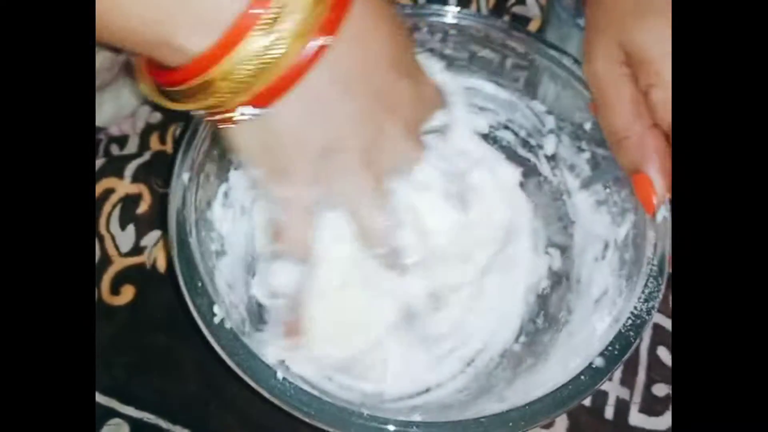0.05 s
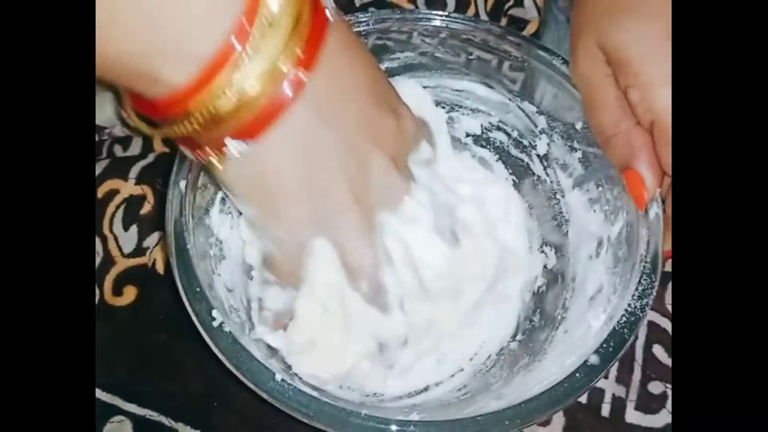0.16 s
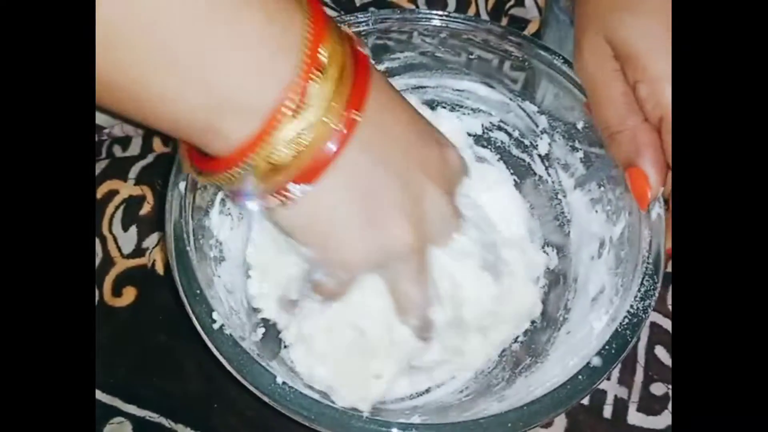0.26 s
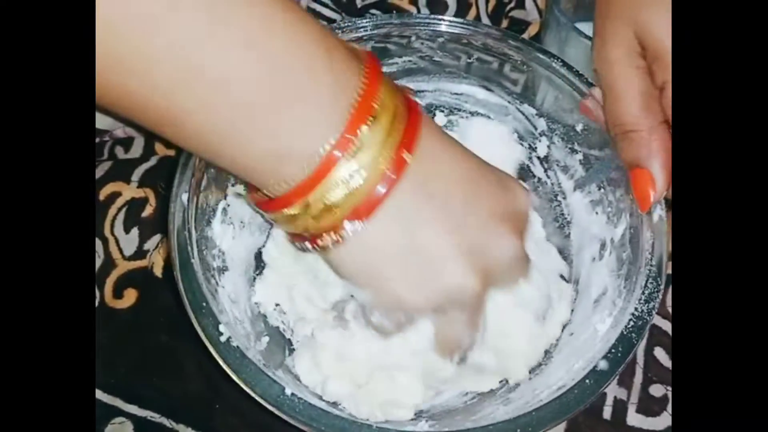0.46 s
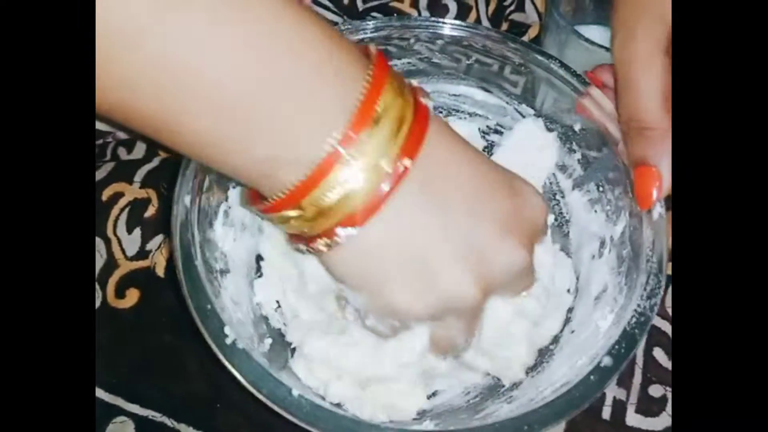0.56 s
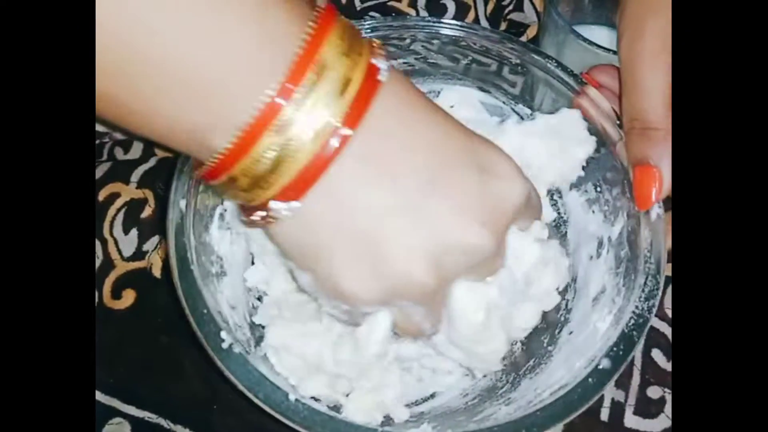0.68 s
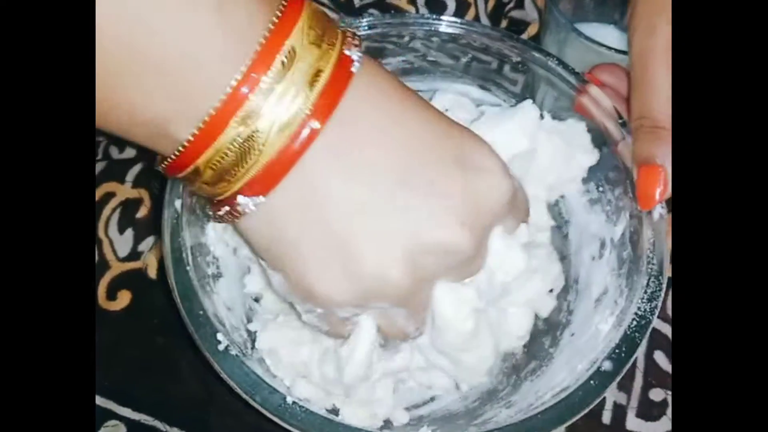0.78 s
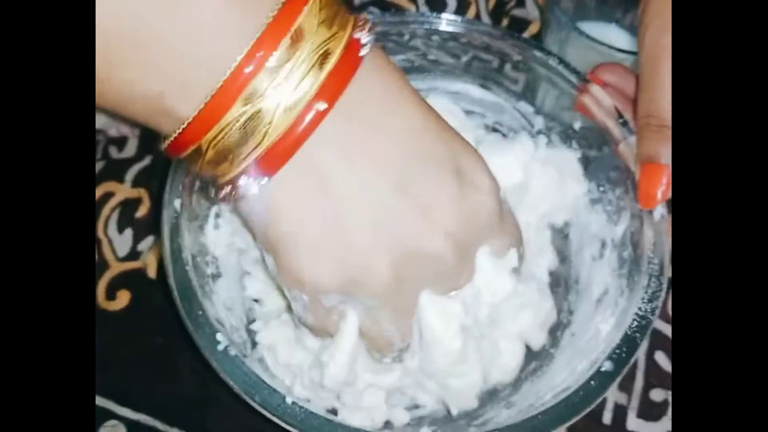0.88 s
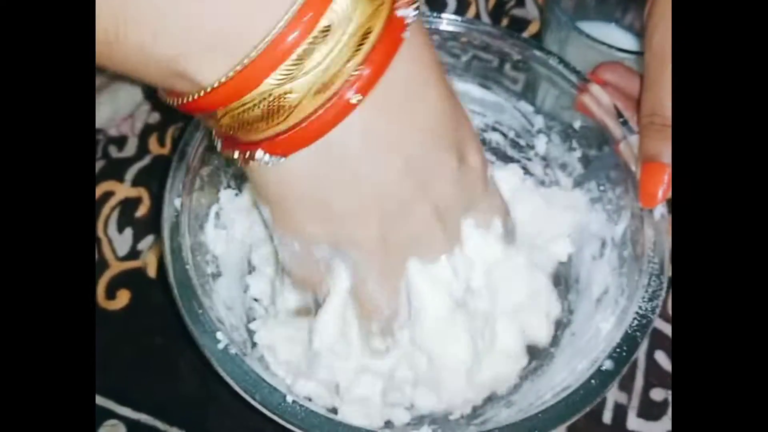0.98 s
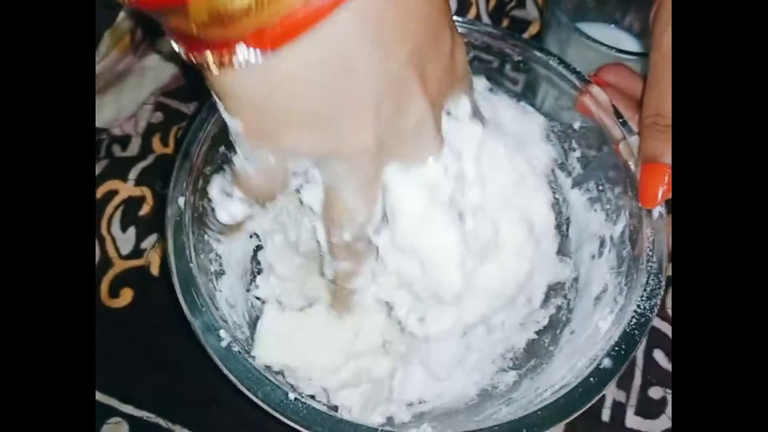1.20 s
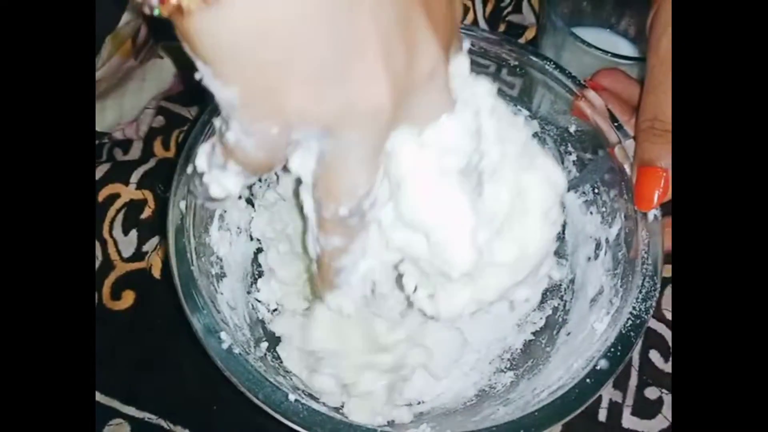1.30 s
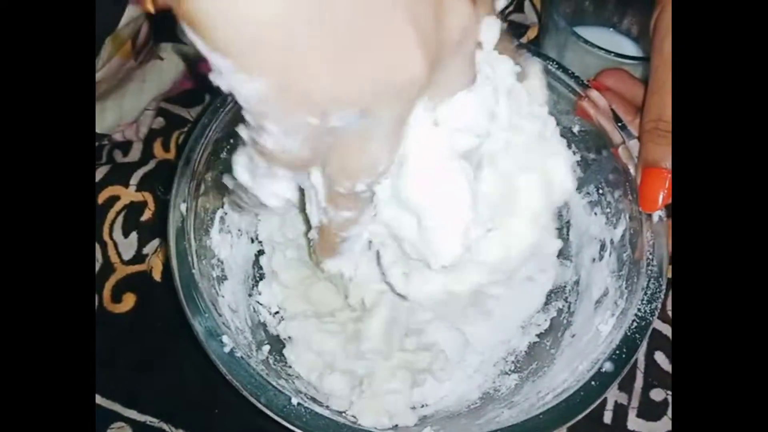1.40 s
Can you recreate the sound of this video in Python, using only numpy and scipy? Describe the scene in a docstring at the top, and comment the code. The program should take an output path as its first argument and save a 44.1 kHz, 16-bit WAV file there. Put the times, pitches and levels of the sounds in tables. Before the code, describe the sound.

Close, wet dough kneading with small ticks, a burst of bright bangle clinks and glass knocks

```python
"""Sticky dough crackles and ticks over a soft rumble: a hand kneads it in a glass bowl, heard close by.
The crackle is filtered random grains and tiny ringing air pockets; the rumble is filtered noise.
Bangles on the wrist soon clink, as noise clashes and struck modes, and knock on the ringing bowl's rim.
Skin squeaks once on the glass, a sinking unsteady sine. A faint hum and air lie under it all,
and the small room adds a diffuse tail to the near sounds."""
import sys
import numpy as np
from scipy import signal
from scipy.fft import rfft, irfft, next_fast_len
from scipy.io import wavfile
from scipy.ndimage import uniform_filter1d

SR = 44100
rng = np.random.default_rng(int(sys.argv[2]) if len(sys.argv) > 2 else 0)


def log_audio(samples):
    """Write samples as a 16-bit WAV file to the path given in sys.argv[1]."""
    # one column per channel
    frames = np.atleast_2d(samples).T
    # limit to full scale, then quantise
    limited = np.clip(frames, -1, 1)
    pcm = np.round(limited * 32767).astype(np.int16)
    wavfile.write(sys.argv[1], SR, pcm)


N = 63945
TIME = np.arange(N) / SR  # seconds
POP_CYCLES = 55  # cycles a short pitched sound rings before it has fallen by 60 dB


def from_db(db):
    """Decibels to gain."""
    return 10 ** (np.asarray(db) / 20)


def rms_one(x):
    """Scale to rms 1."""
    return x / np.sqrt(np.mean(x ** 2) + 1e-20)


def fade(t60):
    """Exponential decay from 1, falling by 60 dB in t60 seconds."""
    return np.exp(-np.log(1000) * TIME / t60)


def tilt(hz, db_per_octave, corner_hz):
    """Gain of a harder or softer contact: 1 at 8 kHz, flat below the corner."""
    octaves = np.log2(np.maximum(hz, corner_hz) / 8000)
    return from_db(db_per_octave * octaves)


def colour(x, points, db_per_octave=0):
    """Causal (minimum-phase) filter through (Hz, dB) points, made by folding the cepstrum."""
    size = 2 * next_fast_len(N)
    hz = np.maximum(np.arange(size // 2 + 1) * SR / size, 1)
    at, db = np.transpose(points)
    gain = from_db(np.interp(np.log(hz), np.log(at), db))
    gain = gain * tilt(hz, db_per_octave, corner_hz=3545)
    cepstrum = irfft(np.log(gain))
    cepstrum[1:size // 2] *= 2
    cepstrum[size // 2 + 1:] = 0
    return irfft(rfft(x, size) * np.exp(rfft(cepstrum)))[:N]


def add(out, s, sound):
    """Mix a sound in from time s."""
    start = int(np.clip(s * SR, 0, N - 1))
    out[start:] += sound[:N - start]


def burst(t60):
    """A dying cluster of tiny contacts: decaying noise of energy 1."""
    x = rng.standard_normal(N) * fade(t60)
    return x / np.sqrt(np.sum(x ** 2))


def snap(t60):
    """One sharp release followed by a short dying crackle."""
    share = 0.26  # part of the energy in the first instant
    return np.sqrt(share) * (TIME == 0) + np.sqrt(1 - share) * burst(t60)


def ring(modes, db_per_octave, scatter_db, detune):
    """Struck modes, varied in strength and pitch from blow to blow; loose contact makes them flutter."""
    rattle_share, rattle_hz = .6, 70  # depth of the flutter, new flutter values per second
    out = np.zeros(N)
    knots = np.arange(int(N / SR * rattle_hz) + 2) / rattle_hz
    for hz, db, t60 in modes:
        strength, shift, phase = rng.standard_normal(3)
        t = TIME[TIME < 2 * t60]
        # complex values flutter both level and phase; the blow itself starts undisturbed
        wander = rng.standard_normal(len(knots)) + 1j * rng.standard_normal(len(knots))
        flutter = 1 + rattle_share * np.interp(t, knots, wander * (knots > 0))
        turn = 2j * np.pi * (hz * (1 + detune * shift) * t + phase)
        wave = np.real(flutter * np.exp(turn - np.log(1000) * t / t60))
        level = from_db(db + scatter_db * strength) * tilt(hz, db_per_octave, corner_hz=1110)
        out[:len(t)] += level * wave
    return out * (1 - fade(.002))  # soft onset


def grains(per_s):
    """Tiny clicks of uneven size and random sign at random instants, rms 1."""
    spread_db = 3.4
    sizes = from_db(spread_db * np.minimum(rng.exponential(1, N), 4)) * rng.choice([-1, 1], N)
    return rms_one(sizes * (rng.random(N) < per_s / SR))


def fine_pops():
    """Tiny air pockets burst at random, each ringing briefly at one of 20 pitches; rms 1."""
    pops_per_s, low_hz, high_hz = 900, 3750, 6200
    out, pitches = np.zeros(N), np.geomspace(low_hz, high_hz, 20)
    for hz in pitches:
        # two-pole resonator: pole radius r, angle w per sample
        r = np.exp(-np.log(1000) * hz / (POP_CYCLES * SR))
        w = 2 * np.pi * hz / SR
        clicks = grains(pops_per_s / len(pitches))
        out += signal.lfilter([np.sin(w)], [1, -2 * r * np.cos(w), r * r], clicks) / hz
    return rms_one(out)


def dough():
    """Dough peels in ticks over a crackle that follows the squeezing, with short pops and faint bowl tones."""
    # Sticky dough lets go. Each row: start in seconds, wet smack in dB, bright tick in dB.
    tick_events = [(0.011, -23, -10), (0.0373, -30, -12), (0.054, -16.5, -20), (0.1714, -49, -21),
                   (0.0962, -36, -32), (0.303, -19, -20), (0.4983, -32, -18), (0.6115, -39, -22),
                   (0.6341, -9.5, -14.5), (0.6398, -14, -23), (0.675, -17, -12.5), (0.699, -49, -14.5),
                   (0.726, -23.5, -27), (0.7293, -18, -17.5), (0.782, -25, -16.5), (0.7861, -17.5, -19),
                   (0.8001, -22, -13.5), (0.8026, -21.5, -14.5), (1.024, -32, -29), (1.0742, -26, -15),
                   (1.091, -32, -19), (1.1085, -22, -20), (1.1267, -23.5, -22.5), (1.139, -35, -21),
                   (1.2213, -50, -27)]
    # Short pitched pops of the dough and faint tones of the bowl, lower ones longer.
    # Each row: start in seconds, pitch in Hz, level in dB.
    pitched_events = [(0.108, 1676, -56), (0.3256, 5400, -34.5), (0.4754, 3630, -42), (0.4875, 3380, -41.5),
                      (0.756, 343, -71.5), (0.784, 4220, -42), (0.801, 3990, -45.5), (0.9126, 3810, -47.5),
                      (0.9689, 5510, -47.5), (0.986, 4250, -41), (0.999, 5400, -46), (1.0407, 3900, -56.5),
                      (1.3119, 3990, -56)]
    # Crackle of the worked dough. Each row: time in seconds, wet part in dB, fine part in dB.
    crackle = [(0, -50, -47.5), (0.059, -57, -46.5), (0.111, -56, -65.5), (0.289, -59, -49),
               (0.345, -64.5, -98), (0.449, -51.5, -59), (0.61, -62, -53), (0.68, -62.5, -64),
               (0.742, -59, -49), (0.758, -73.5, -79), (0.793, -58.5, -52), (0.877, -76.5, -66.5),
               (0.941, -69, -61), (0.992, -59.5, -53.5), (1.05, -66.5, -57), (1.164, -74, -55),
               (1.25, -86, -69), (1.33, -71.5, -60.5), (1.378, -89.5, -80), (1.45, -88.5, -87)]
    # Colours of the smacks and wet crackle, of the ticks, of the finest crackle. Each row: Hz, dB.
    smack_colour = [(500, -36.5), (1500, -22), (2700, -22), (3300, -8), (3950, -4.5), (5200, -9.5),
                    (7000, -13), (10000, -17.5), (16000, -25)]
    tick_colour = [(2500, -47.5), (4000, -9.5), (7000, -21), (10000, -11), (13000, -0.5), (14800, 8),
                   (16000, -12)]
    fizz_colour = [(2500, -41.5), (4000, -27.5), (8500, -19), (11000, -7.5), (13000, 5), (14800, 15),
                   (15400, 6.5), (15900, -8)]
    smack_t60_s, tick_t60_s = .01, .007
    grains_per_s, fine_pop_share = 4000, .7

    smacks, ticks, pitched = np.zeros((3, N))
    for s, smack_db, tick_db in tick_events:
        add(smacks, s, from_db(smack_db) * snap(smack_t60_s))
        add(ticks, s, from_db(tick_db) * snap(tick_t60_s))
    for s, hz, db in pitched_events:
        add(pitched, s, ring([(hz, db, POP_CYCLES / hz)], 0, scatter_db=1.5, detune=0))

    s, wet_db, fine_db = np.transpose(crackle)
    wet_grains = rms_one(colour(grains(grains_per_s), smack_colour))
    wet = rms_one(wet_grains + fine_pop_share * fine_pops())
    wet = from_db(np.interp(TIME, s, wet_db)) * wet
    fine = rms_one(colour(grains(grains_per_s), fizz_colour))
    fine = from_db(np.interp(TIME, s, fine_db)) * fine
    return colour(smacks, smack_colour) + colour(ticks, tick_colour) + pitched + wet + fine


def background():
    """Low rumble of the pushed bowl and room air, both filtered noise, and a steady sine hum."""
    # Rumble under the pushes. Each row: time in seconds, level in dB.
    rumble_level = [(0, -48.5), (0.055, -79), (0.21, -65.5), (0.385, -83), (0.44, -59), (0.53, -53),
                    (0.56, -68), (0.655, -59.5), (0.82, -86), (0.87, -62), (0.94, -70.5), (1.0, -74.5),
                    (1.1, -73.5), (1.215, -56.5), (1.255, -71), (1.42, -64), (1.45, -78)]
    # Colours of the rumble and of the room air. Each row: Hz, dB.
    rumble_colour = [(25, -24.5), (60, -12), (85, -6), (100, 5), (120, -8), (150, -6.5), (200, -21.5),
                     (400, -42.5), (1000, -51)]
    air_colour = [(30, 0.5), (100, 12), (250, 3), (450, -8), (1200, -5), (2500, -12), (8000, -23),
                  (16000, -25.5)]
    hum_hz, hum_db, air_db = 99.5, -78, -74

    rumble = rms_one(colour(rng.standard_normal(N), rumble_colour))
    rumble *= from_db(np.interp(TIME, *np.transpose(rumble_level)))
    hum = from_db(hum_db) * rms_one(np.sin(2 * np.pi * hum_hz * TIME))
    air = from_db(air_db) * rms_one(colour(rng.standard_normal(N), air_colour))
    return rumble + hum + air


def bangles():
    """Each clink is a short clash of the stack and the ring of the bangles that met."""
    # Bangles meet. Each row: start in seconds, ring in relative dB, ring brightness in dB per octave,
    # clash in relative dB, clash brightness in dB per octave.
    clinks = [(0.1167, -15.5, -11, -59, -3), (0.193, -20, -31, -75, -6), (0.2035, -18, -20.5, -61, -9),
              (0.215, -7.5, -8, -18, -11), (0.2333, 5.5, 0, -5.5, -0.5), (0.2416, -9, 4, -0.5, -0.5),
              (0.326, -20.5, -12, -17.5, -6.5), (0.3593, 4.5, -2, 4.5, -10.5),
              (0.3765, -4.5, -10, -3, -9.5), (0.388, 3.5, -3, -9, -9), (0.4115, -1, -10, -7, -4),
              (0.422, -11.5, -3, -15.5, -20), (0.4276, 3, -14.5, -13, -4), (0.454, -22.5, 8, -8.5, -6),
              (0.471, -11, -3, -14.5, -4), (0.489, -34, -21.5, -26, -19.5), (0.5323, -8, -1, -4.5, -3.5),
              (0.5373, -6.5, 7, 0, 1.5), (0.5425, -9, 8.5, -2.5, 0.5), (0.5607, -15, 5, -28, 8),
              (0.5754, -7, -2.5, -2.5, 2.5), (0.578, -4, 10, -5, 8), (0.608, -14.5, 3, -22, -11.5),
              (0.807, -23, -16, -33, 10), (0.9715, -36, -23, -48, -13), (1.223, -38, -13.5, -53.5, -3.5)]
    # The thick bangle joins in with a lower note. Each row: start in seconds, level in relative dB.
    thick_clinks = [(0.2337, -4.5), (0.5378, -2), (0.5765, -1)]
    # Modes of the thin and the thick bangles. Each row: pitch in Hz, level in relative dB, t60 in seconds.
    thin_modes = [(5370, -44, .07), (6020, -43, .045), (7700, -34.5, .055), (7780, -40, .085),
                  (10430, -39.5, .06), (11220, -41, .055), (13330, -28, .055), (14555, -28.5, .05),
                  (14650, -33, .055), (15110, -40, .05)]
    thick_modes = [(2085, -51, 0.06), (2190, -53, .05)]
    # Colour of the dense clash of the whole stack. Each row: Hz, dB.
    clash_colour = [(500, -38.5), (1500, -30), (2100, -29.5), (2700, -25), (3400, -7), (4800, -11),
                    (5900, 1.5), (6900, -10), (9300, -11), (12300, -8.5), (14700, 12.5), (15600, -3)]
    clash_gain_db, clash_t60_s = -1.5, 0.052

    out = np.zeros(N)
    for s, ring_db, ring_bright_db, clash_db, clash_bright_db in clinks:
        clash = colour(burst(clash_t60_s), clash_colour, clash_bright_db)
        clash *= from_db(clash_gain_db + clash_db)
        ringing = from_db(ring_db) * ring(thin_modes, ring_bright_db, scatter_db=4.5, detune=0.001)
        add(out, s, clash + ringing)
    for s, db in thick_clinks:
        add(out, s, from_db(db) * ring(thick_modes, 0, scatter_db=2, detune=0.011))
    return out


def bowl():
    """A bangle clacks on the rim and the glass rings, damped by the dough; later a low bump and a tick."""
    # A bangle strikes the bowl. Each row: start in seconds, clack in relative dB, clack t60 in seconds,
    # ring in relative dB, ring brightness in dB per octave.
    knocks = [(0.3549, -3.5, 0.022, -22, -8), (0.3675, -4, 0.021, -1, 1.5), (0.378, -15, 0.011, -22, -2),
              (0.4285, -36, 0.016, -24.5, -7)]
    # The glass rings. Each row: pitch in Hz, level in relative dB, undamped t60 in seconds.
    glass_modes = [(618, -59, 0.38), (1639, -45, 0.2), (3048, -44, 0.22), (4810, -13.5, 0.057),
                   (5920, -34, .065), (6828, -32, 0.11), (8725, -32, 0.085), (9135, -37, 0.1),
                   (12010, -34, .09), (12845, -23, 0.072)]
    # A low bump and a short, sharp tick. Each row: start in seconds, level in dB, t60 in seconds.
    bump_and_tick = [(0.9962, -23, .07), (1.2742, -31, 0.0093)]
    # Colours of the clack of the contact and of the bump and tick. Each row: Hz, dB.
    clack_colour = [(200, -35), (600, -22.5), (950, -2), (1250, 7.5), (1550, -7), (2000, -1), (2650, -13.5),
                    (3400, -4.5), (6000, -6.5), (7000, 3.5), (9500, 3), (12500, -2), (13900, 16.5),
                    (15700, -3)]
    thud_colour = [(200, 6.5), (550, -9), (1100, 3.5), (1700, 2.5), (2600, -19), (8000, -41)]
    clack_gain_db = 2
    damped_s, damped_t60_s = .475, .1  # the next push presses dough on the glass and stops its ring

    clacks, rings, thuds = np.zeros((3, N))
    for s, clack_db, clack_t60, ring_db, bright_db in knocks:
        add(clacks, s, from_db(clack_db) * burst(clack_t60))
        add(rings, s, from_db(ring_db) * ring(glass_modes, bright_db, scatter_db=1.0, detune=0))
    for s, db, t60 in bump_and_tick:
        add(thuds, s, from_db(db) * snap(t60))
    rings *= np.interp(TIME - damped_s, TIME, fade(damped_t60_s))  # 1 until the push
    return from_db(clack_gain_db) * colour(clacks, clack_colour) + rings + colour(thuds, thud_colour)


def squeak():
    """Skin slips on glass: a faint sinking sine, roughened by random unevenness of pitch."""
    start_s, length_s, level_db = .61, .19, -67.5
    from_hz, to_hz, unevenness = 2720, 2420, .06  # unevenness: rms share of the pitch
    progress = np.clip((TIME - start_s) / length_s, 0, 1)
    wobble = rms_one(uniform_filter1d(rng.standard_normal(N), size=100))
    hz = (from_hz + (to_hz - from_hz) * progress) * (1 + unevenness * wobble)
    swell = np.sin(np.pi * progress)
    return from_db(level_db) * swell * np.sin(2 * np.pi * np.cumsum(hz) / SR)


def room(x):
    """A diffuse tail that builds up quickly; lows and treble each have their own length and level."""
    split_hz, onset_s = 5200, 0.029
    response = 0
    # each band: filter kind, t60 in seconds, level in dB
    for kind, t60, db in (("low", 0.27, -8.5), ("high", 1, -23.5)):
        band = signal.butter(2, split_hz, kind, fs=SR, output="sos")
        response = response + from_db(db) * signal.sosfilt(band, burst(t60))
    return signal.fftconvolve(x, response * np.minimum(TIME / onset_s, 1))[:N]


def scene():
    """Dough, bangles, bowl and squeak close by with their room tail, over the background."""
    near = dough() + bangles() + bowl() + squeak()
    return (near + room(near) + background())[None]


def record(dry):
    """The top is cut steeply above 15.7 kHz."""
    steep_cut = signal.ellip(10, .2, 80, 15700, fs=SR, output="sos")  # .2 dB ripple, 80 dB stopband
    return signal.sosfilt(steep_cut, dry)


dry = scene()
out = record(dry)
log_audio(out)
```